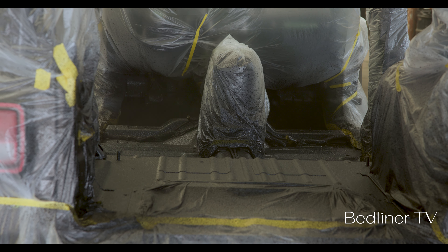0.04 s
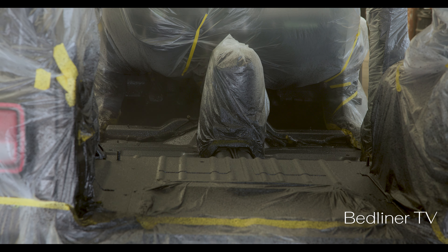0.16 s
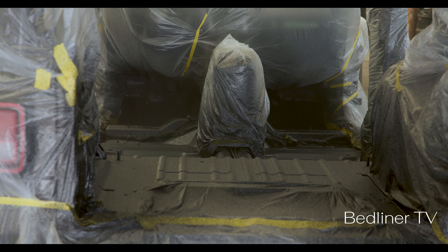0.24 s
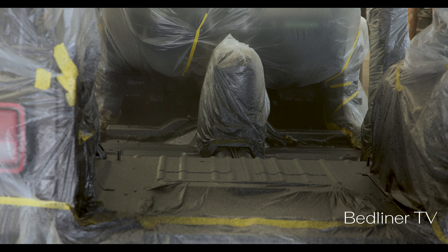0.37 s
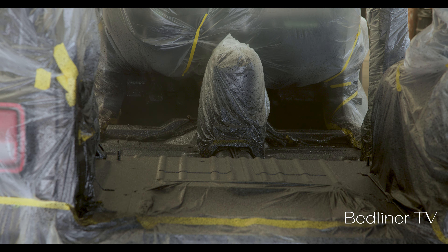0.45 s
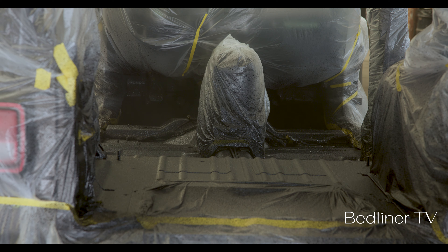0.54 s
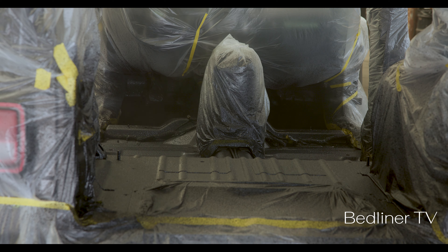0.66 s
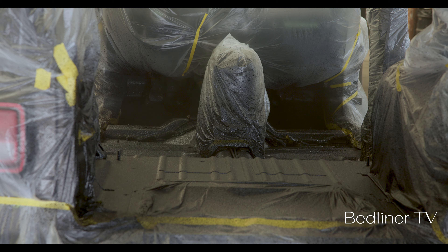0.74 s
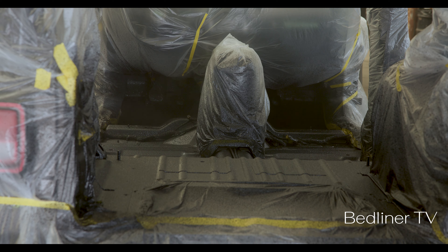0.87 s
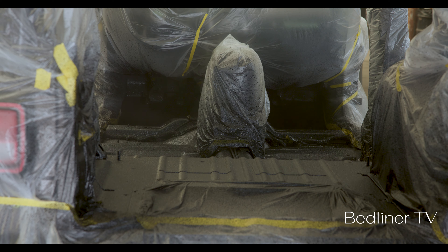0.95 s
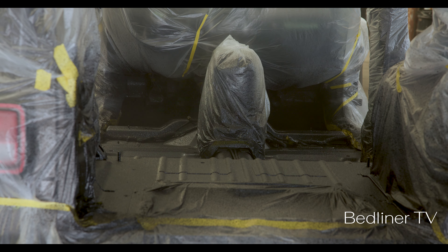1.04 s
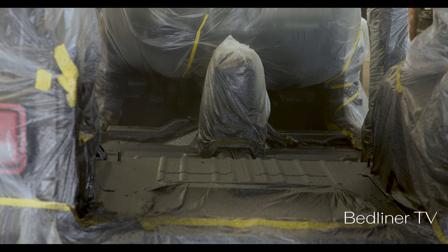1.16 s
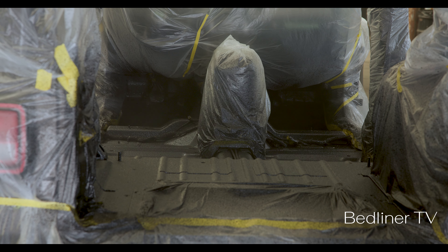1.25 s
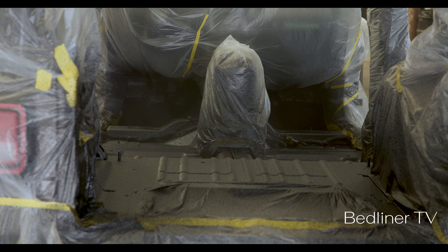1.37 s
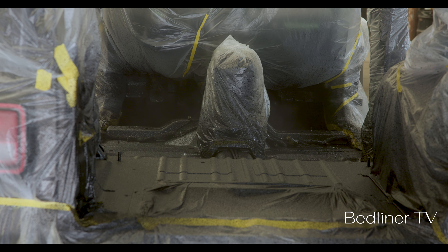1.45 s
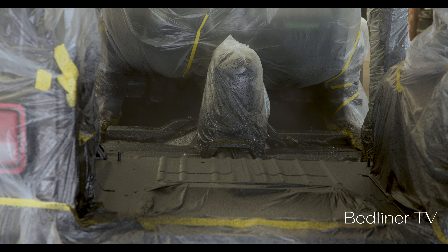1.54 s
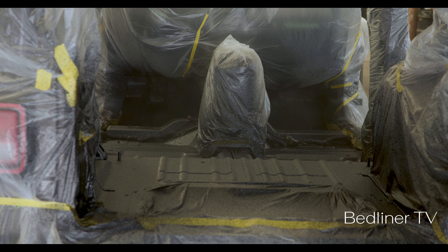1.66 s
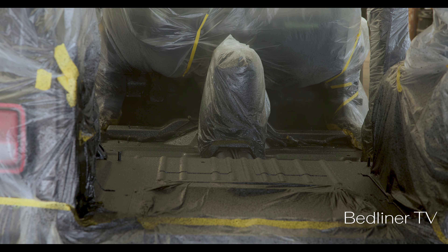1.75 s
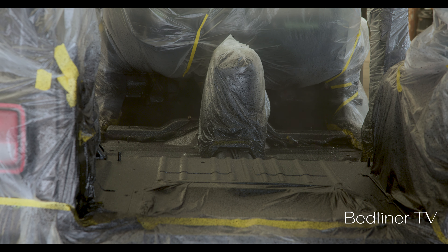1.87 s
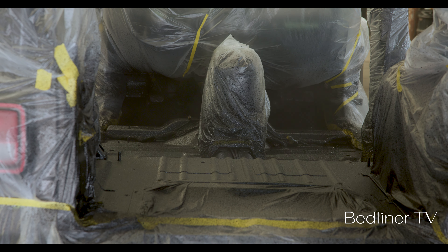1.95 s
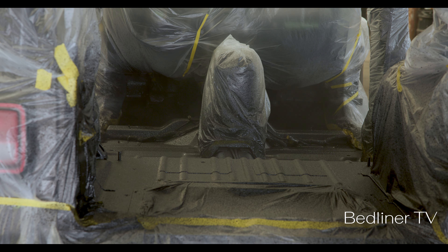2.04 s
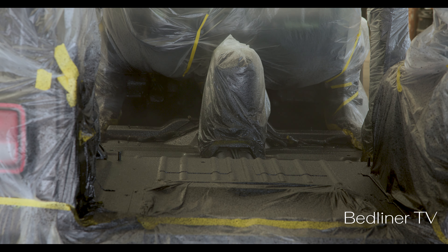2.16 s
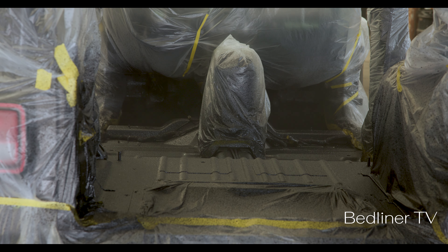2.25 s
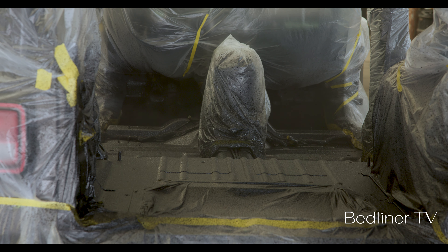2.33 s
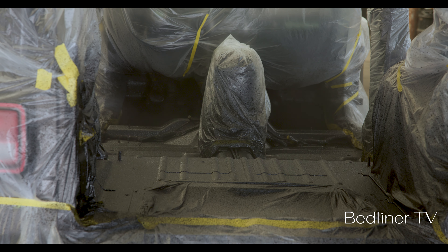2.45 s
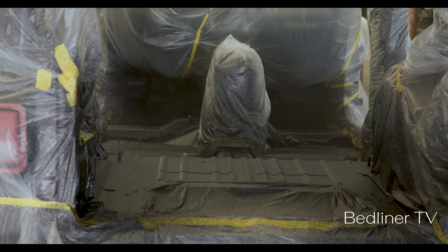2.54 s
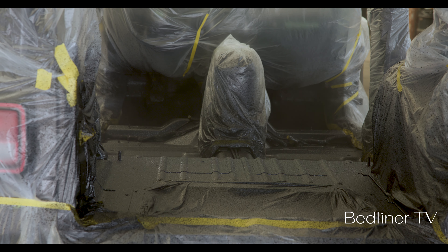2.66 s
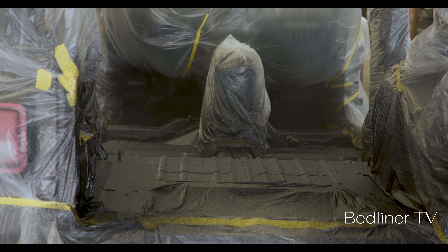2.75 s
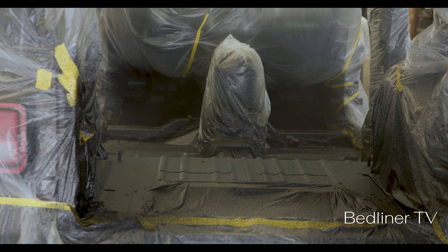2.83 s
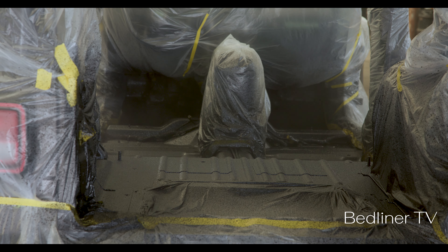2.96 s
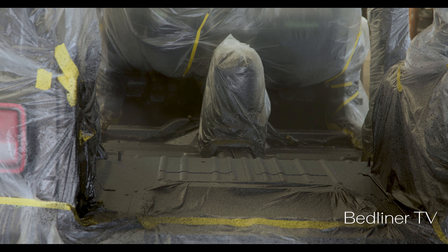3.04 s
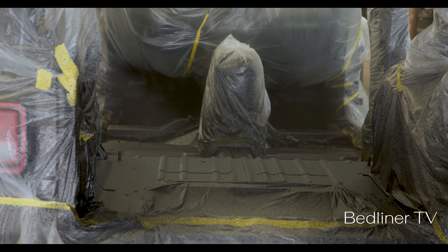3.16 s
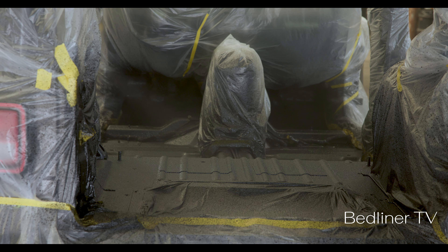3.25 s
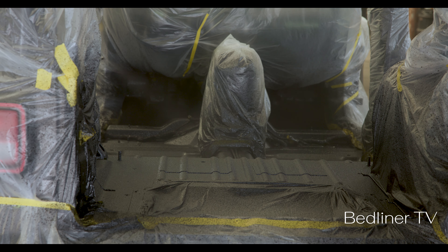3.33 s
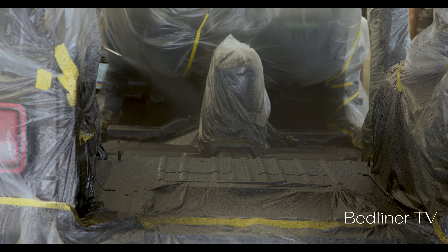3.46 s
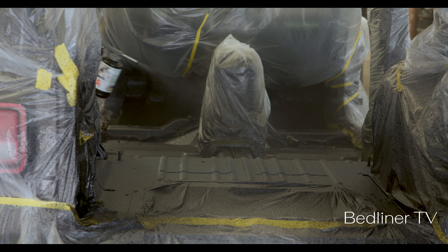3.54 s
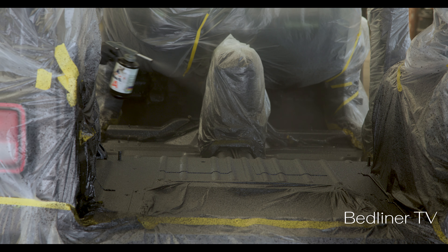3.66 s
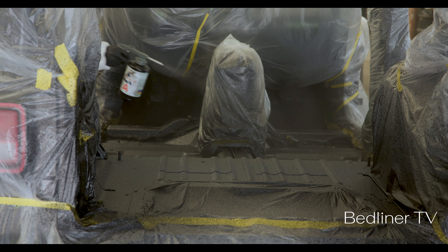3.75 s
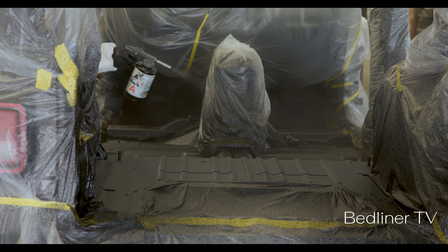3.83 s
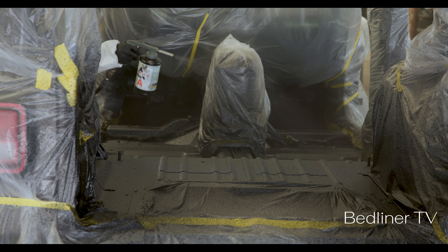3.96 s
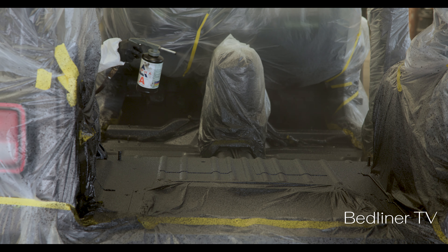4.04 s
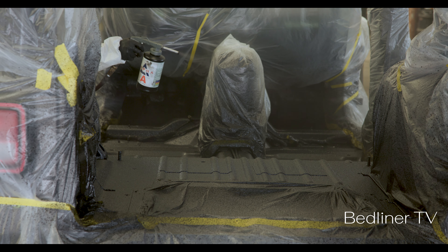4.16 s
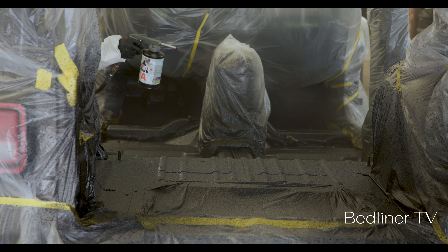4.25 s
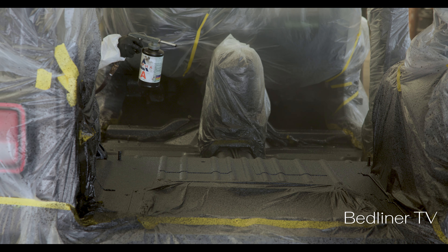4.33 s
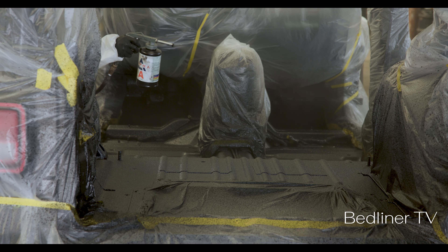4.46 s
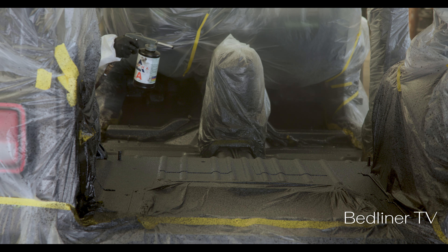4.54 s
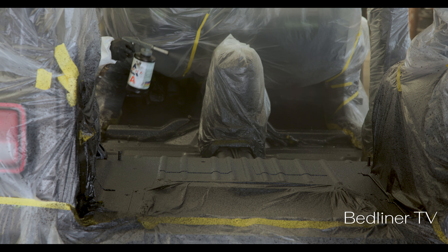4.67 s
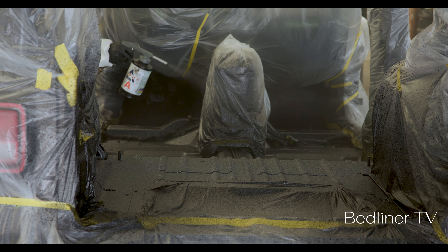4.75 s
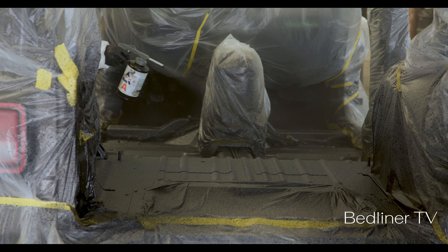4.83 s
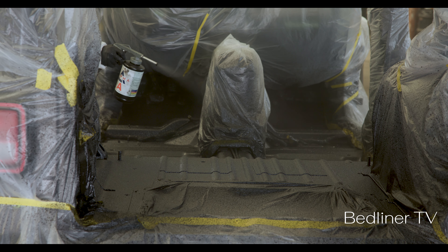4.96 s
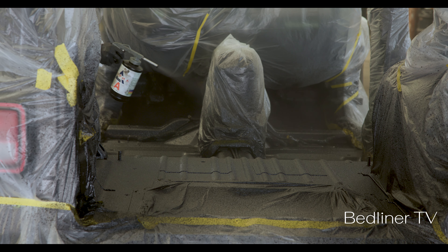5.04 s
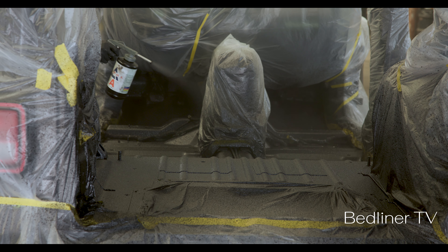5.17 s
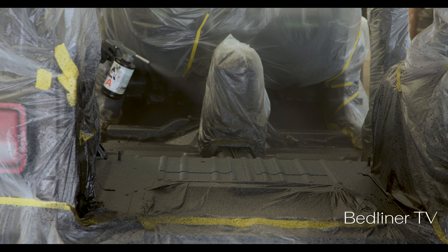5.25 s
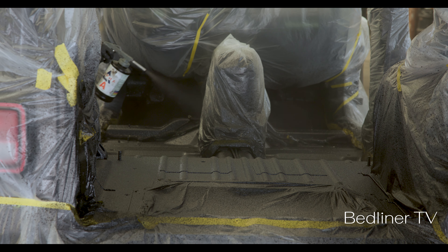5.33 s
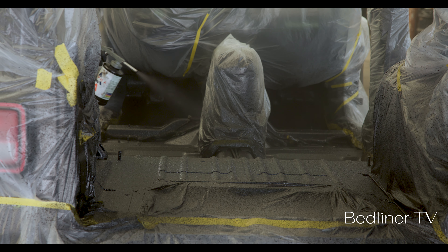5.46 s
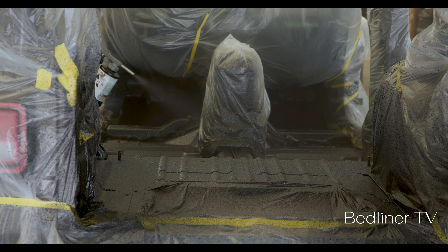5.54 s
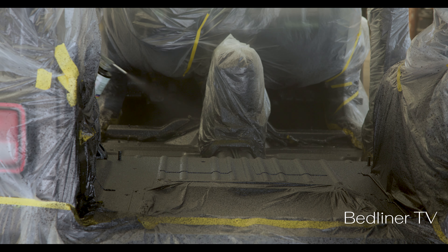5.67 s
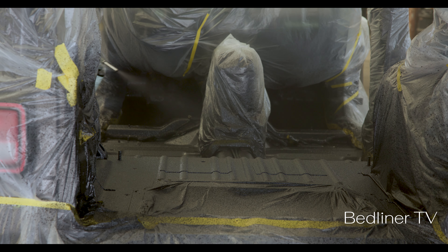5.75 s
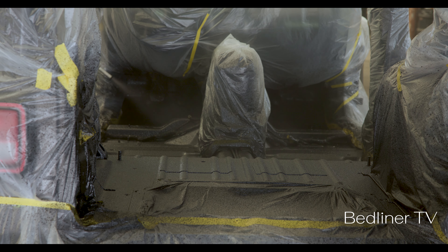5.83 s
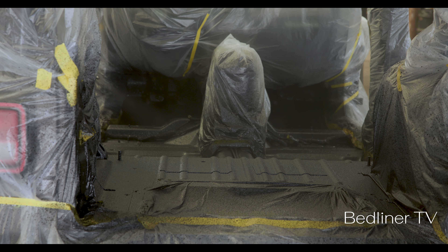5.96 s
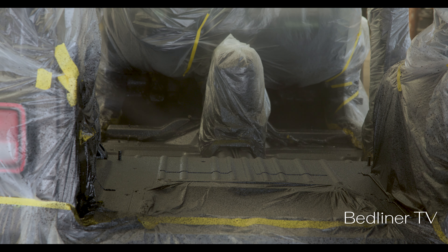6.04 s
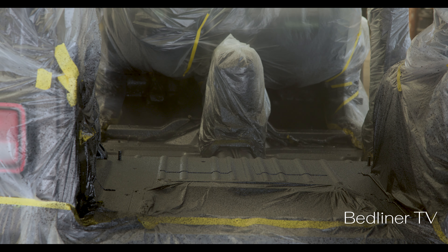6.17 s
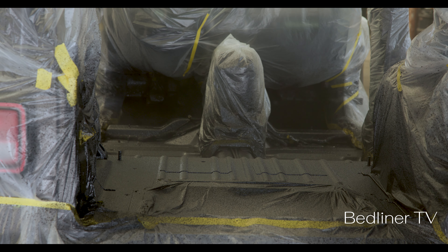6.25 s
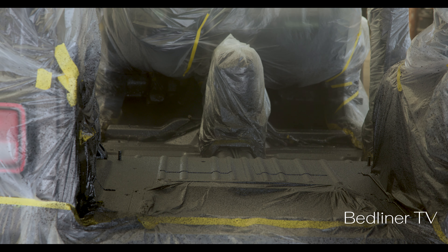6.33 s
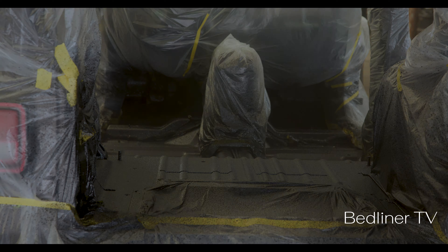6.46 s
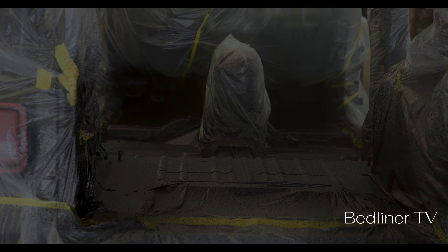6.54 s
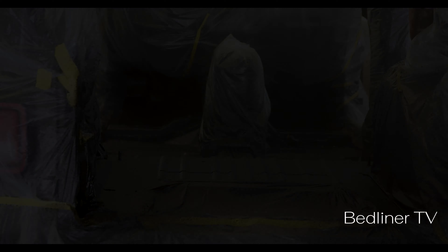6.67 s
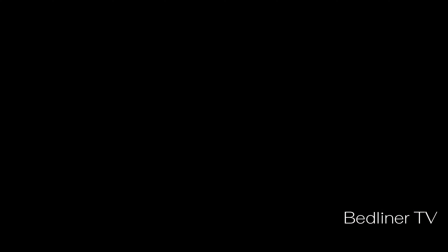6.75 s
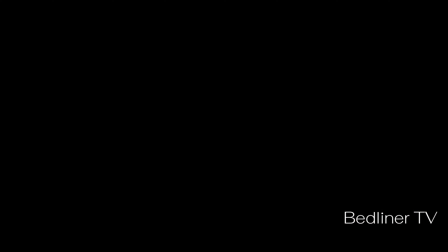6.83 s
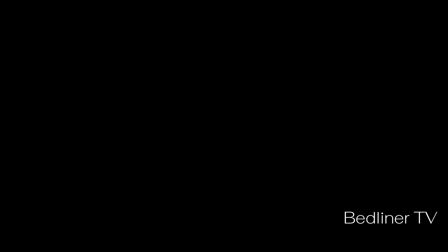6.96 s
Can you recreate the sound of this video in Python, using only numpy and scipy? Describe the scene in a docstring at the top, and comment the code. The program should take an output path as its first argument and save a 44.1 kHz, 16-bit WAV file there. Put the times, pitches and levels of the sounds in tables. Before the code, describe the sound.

Harsh airy spraying in a plastic-lined van stops for half a second, dull bumps are heard, and the rough hiss resumes before a final fade.

```python
"""An air spray gun hisses and sputters: turbulent noise split into six bands, each with its own level.
The trigger is let go once and pulled again; changing delays shift the echoes off the near panels.
The gun works inside a van lined with plastic sheet, whose reverberation is built from decaying noise;
a click, soft sine knocks and a faint noise rustle accompany it. Behind, a workshop hums and rumbles.
One small microphone hears it all, and the whole sound is faded out at the end."""
import sys
import numpy as np
from scipy import signal
from scipy.fft import rfft, irfft, next_fast_len
from scipy.io import wavfile
from scipy.ndimage import uniform_filter1d, map_coordinates

SR = 44100
rng = np.random.default_rng(int(sys.argv[2]) if len(sys.argv) > 2 else 0)


def to_wav(s):
    """Save 16-bit WAV."""
    ch = np.atleast_2d(s).T  # columns
    pcm = np.round(np.clip(ch, -1, 1) * 32767)  # PCM
    wavfile.write(sys.argv[1], SR, pcm.astype(np.int16))


N = 308700
TIME_S = np.arange(N) / SR


def amp(db):
    """Decibels to an amplitude ratio: 20 dB is a factor of ten."""
    return 10 ** (np.asarray(db) / 20)


def unit(x):
    """Normalise to a root-mean-square value of 1."""
    return x / np.sqrt(np.mean(x ** 2) + 1e-20)


def along(points, hz):
    """Interpolate (Hz, value) points on a logarithmic frequency axis."""
    f, v = np.transpose(points)
    return np.interp(np.log(hz + 1), np.log(f + 1), v)


def curves(rows):
    """Interpolate linearly in time: one value per sample for each column after the time."""
    s, *cols = np.transpose(rows)
    return [np.interp(TIME_S, s, c) for c in cols]


def wobble(rate):
    """Slow random modulation: a smooth curve through random knots, rate of them a second."""
    knots = rng.standard_normal(int(N * rate / SR) + 4)
    return map_coordinates(knots, [np.arange(N) * rate / SR])


def filtered(x, response):
    """Linear filtering: the spectrum of x is multiplied by a response of frequency."""
    m = next_fast_len(N + SR // 2)
    hz = np.fft.rfftfreq(m, 1 / SR)
    return irfft(rfft(x, m) * response(hz), m)[..., :N]


def noise(spectrum):
    """Spectral shaping: white noise is coloured by (Hz, dB) points and brought to rms 1."""
    return unit(filtered(rng.standard_normal(N), lambda hz: amp(along(spectrum, hz))))


def workshop():
    """Superposition of lumpy low noise, a phase-modulated mains hum that breaks up and thin far air noise."""
    # spectrum of the rumble: frequency_hz, density_db
    rumble_spectrum = [(15, -50), (30, -22), (86, -9), (113, -6), (146, -3.5), (220, -6.5), (340, -9.5),
                       (570, -120)]
    # course of the rumble: time_s, level_db
    rumble_course = [(.4, -71), (.64, -74), (.9, -64), (1.1, -63), (1.3, -65), (1.5, -77), (3.3, -75.5),
                     (3.45, -66), (4.25, -69.5), (4.45, -76), (6.4, -73.5)]
    # spectrum of the far air: frequency_hz, density_db
    air_spectrum = [(200, -3.5), (400, 5), (800, -1), (1150, -4.5), (1500, -9.5), (2300, -3), (4000, -12),
                    (8000, -24), (16000, -31)]
    # course of the far air: time_s, level_db
    air_course = [(.55, -67), (.66, -70), (.8, -67.5), (.88, -67), (1.0, -64)]
    hum_hz, hum_db = 120, -71
    swell_db = .8  # the rumble swells a few times a second

    waver_rad = .7 * wobble(12)
    throb_db = 2 * wobble(8) - 6 * np.abs(wobble(4))
    hum = np.sqrt(2) * np.sin(2 * np.pi * hum_hz * TIME_S + waver_rad) * amp(throb_db)
    rumble = unit(amp(2.2 * wobble(11)) * noise(rumble_spectrum))
    rumble_db = curves(rumble_course)[0] + swell_db * wobble(3.44)
    air_db = curves(air_course)[0] + .8 * wobble(25)
    return amp(hum_db) * hum + amp(rumble_db) * rumble + amp(air_db) * noise(air_spectrum)


def cabin(x):
    """Reverberation as exponentially decaying noise, each frequency dying at its own speed."""
    # decay of the enclosure: frequency_hz, t60_s
    decay = [(200, 0.27), (2000, 0.21), (6000, 0.29), (12000, 0.11)]
    # the decaying noise is drawn anew twelve times a second and crossfaded, so no fixed colour rings on
    hop = SR // 12
    window = np.sqrt(np.hanning(2 * hop))  # crossfade of equal power
    out = np.zeros(N + 2 * SR)
    for start in range(-hop, N, hop):
        hz, t, z = signal.stft(rng.standard_normal(SR // 2), SR, nperseg=256)
        decay_db = -60 * t / along(decay, hz)[:, None]
        tail = signal.istft(z * amp(decay_db), SR, nperseg=256)[1]
        first = max(start, 0)
        piece = x[first:start + 2 * hop] * window[max(-start, 0):][:N - first]
        wet = signal.fftconvolve(piece, tail / np.linalg.norm(tail))
        out[first:][:len(wet)] += wet
    return out[:N]


def rustle():
    """Crinkling as randomly modulated noise: the plastic sheet stirs before the trigger is pulled again."""
    # spectrum of the sheet: frequency_hz, density_db
    sheet_spectrum = [(1500, -30), (3500, -3), (6000, 2), (10000, -30)]
    # course of the crinkling: time_s, level_db
    sheet_course = [(.87, -97), (.9, -75), (1.03, -81)]
    return amp(curves(sheet_course)[0] + 3 * wobble(120)) * noise(sheet_spectrum)


def knocks():
    """Modal decay: each soft contact is a dull, short mode with a weaker, quicker one above it."""
    # contacts as the painter shifts: start_s, level_db, pitch_hz, t60_s
    contacts = [(.235, -52, 135, .14), (.672, -45, 150, .055), (.697, -48, 185, .05), (.772, -59, 410, .09),
                (.807, -44, 300, .025), (.812, -35, 160, .035), (.86, -54, 140, .07), (.895, -55, 300, .06),
                (.972, -49, 140, .07), (1.022, -40, 190, .06), (1.245, -46, 170, .06)]
    out, t = np.zeros(N + SR), np.arange(SR // 5) / SR
    for start_s, level_db, pitch_hz, t60_s in contacts:
        lower = np.sin(2 * np.pi * pitch_hz * t)
        upper = .5 * amp(-40 * t / t60_s) * np.sin(2 * np.pi * 1.32 * pitch_hz * t)
        onset = 1 - np.exp(-t / 0.0035)
        out[round(start_s * SR):][:len(t)] += amp(level_db - 60 * t / t60_s) * onset * (lower + upper)
    # the knocks carry no deep bass
    radiation = signal.butter(N=3, Wn=95, btype="high", fs=SR, output="sos")
    return signal.sosfilt(radiation, out[:N])


def trigger_click():
    """Impact as a short puff of mid-range noise, decaying exponentially: the trigger meets its stop."""
    # one impact: start_s, level_db, t60_s
    start_s, level_db, t60_s = (.571, -54, .025)
    t = TIME_S - start_s
    tick = noise([(200, -30), (400, 0), (900, -2), (1800, -14), (5000, -40)])  # (Hz, dB)
    onset = np.clip(t / 0.0023, 0, 1)
    return onset * amp(level_db - 60 * np.abs(t) / t60_s) * tick


def patchy(x, depth_db, bins, frames):
    """Turbulent intermittency: eddies brighten now one band, now another, the treble most."""
    hz, _, z = signal.stft(x, SR, nperseg=512)
    field = uniform_filter1d(rng.standard_normal(z.shape), round(bins), 0)
    field = uniform_filter1d(field, round(frames), 1)
    depth = depth_db * np.clip(0.24 + hz / 4000, 0, 1.3)[:, None]
    return signal.istft(z * amp(depth * unit(field)), SR, nperseg=512)[1][:N]


def echo(x, delay_ms):
    """Propagation delay: x heard over a longer path whose length changes."""
    return map_coordinates(x, [np.arange(N) - delay_ms * SR / 1000], mode="mirror")


def near_echoes(x, count, strength, drift_ms):
    """Comb filtering by interference with delayed copies; the combs slide as the gun moves."""
    # echo paths: time_s, panel_share, panel_delay_ms, wall_delay_ms, floor_delay_ms, cup_delay_ms
    # (the sprayed panel, the side wall, the floor and the paint cup)
    paths = [(0, 0.17, 2.56, 1.04, 0.6, 0.13), (.45, 0.87, 2.99, 1.12, 0.47, 0.15),
             (1.2, 0.29, 2.67, 1.51, 0.48, 0.13), (1.9, .1, 2.23, 1.52, 0.39, 0.076),
             (2.1, 0.28, 2.03, 1.57, 0.46, 0.098), (2.9, 0.17, 1.92, 1.66, 0.41, 0.092),
             (3.3, 0.12, 2.1, 1.65, 0.45, 0.14), (3.75, 0.1, 1.87, 1.29, 0.4, 0.16),
             (4.2, 0.41, 2.195, 1.2, 0.35, 0.23), (4.7, 0.31, 2.24, 1.01, 0.24, 0.18),
             (5.3, 0.3, 1.85, 1.7, 0.16, 0.19), (5.7, 0.45, 2.276, 1.35, 0.042, .15),
             (6.1, 0.4, 2.43, 1.4, 0.12, 0.12), (6.5, 0.26, 2.48, 1.25, 0.34, 0.081)]
    # mean shares that side wall, floor and cup return: share (one number each)
    mean_returns = [0.13, 0.15, 0.14]
    turning = 0.35  # depth by which the shares swell and shrink as the gun turns

    def steel(hz):
        """Selective reflection: steel faces return mostly the middle of the hiss."""
        hump = 0.13 + 0.61 / (1 + ((hz - 2700) / 1300) ** 2)
        return 1.26 * hump / np.sqrt(1 + (hz / 9000) ** 4)

    middle = filtered(x, steel)
    dull = filtered(x, lambda hz: 1 / np.sqrt(1 + (hz / 5500) ** 6))
    out, energy = x.copy(), 1
    panel_share, *delays = curves(paths)
    # panel and wall are steel, the floor dulls, the cup returns the whole hiss
    for delay_ms, share, sent in zip(delays, [panel_share, *mean_returns], (middle, middle, dull, x)):
        out += share * (1 + turning * wobble(2.91)) * echo(sent, delay_ms)
    # the wrinkled sheet returns many weak, wandering copies of the whole hiss
    for delay_ms in np.geomspace(1.5, 11, count):
        gain = strength * wobble(7)
        out += gain * echo(x, delay_ms + drift_ms * wobble(5))
        energy = energy + gain ** 2
    return out / np.sqrt(energy)


def stranded(x):
    """Time-varying equalisation: narrow bands stand out or thin as the gun moves among the panels."""
    # one course per strand, low to high: time_s, centre_hz, lift_db
    courses = [
        [(0, 332, 1), (1.4, 350, 0), (2.2, 420, -4), (5.3, 403, -1), (5.75, 410, -10), (6.4, 410, -12)],
        [(0, 790, 3), (.45, 810, 4), (1.2, 690, -0.5), (1.6, 800, 2), (2.25, 1100, 1.5), (3.0, 1120, 2),
         (4.1, 955, 2), (4.9, 990, 5), (5.6, 1300, 1.5), (6.0, 1260, 2), (6.3, 1080, 6), (6.6, 840, 5),
         (7, 840, 4)],
        [(0, 2130, 6), (.45, 2200, 3), (1.05, 2270, 2.5), (1.3, 2130, 3), (1.6, 2170, 3.5), (2.25, 2480, 3.5),
         (2.95, 2560, 1), (3.3, 2420, 2), (4.1, 2390, -3), (4.55, 2620, 5.5), (5.1, 2400, -1.5),
         (5.55, 2170, 1.5), (6.0, 2230, 0), (6.3, 2230, 5), (6.65, 2210, 7.5), (7, 2300, 4)],
        [(0, 3180, 2.5), (.2, 3150, 6), (.4, 3580, 5.5), (1.05, 3150, -4.5), (1.3, 3620, 5.5),
         (1.55, 3650, 7.5), (1.9, 3100, 2), (2.2, 2880, 6.5), (2.55, 2950, 5), (3.0, 2980, 2), (3.2, 3400, -2),
         (5.45, 3240, -2.5), (6.5, 3020, -5), (7, 2750, 0)],
        [(0, 5200, -5), (.35, 5940, 3.5), (1.2, 5600, -1), (2.7, 5900, -2.5), (3.1, 4970, 4.5), (3.4, 5030, 6),
         (3.8, 5440, 2), (4.5, 6030, 2), (5.1, 5400, 5.5), (5.5, 5700, -1.5), (6.4, 5400, 2.5),
         (6.8, 5300, 5.5)],
        [(0, 7430, 3), (1.2, 7400, 5), (2.25, 7460, -5.5), (3.1, 7500, 1.5), (4.7, 7600, 0), (5.1, 7000, 5.5),
         (5.8, 7140, -3.5), (6.4, 7100, 0.5), (7, 7300, -1)],
        [(0, 8800, -5), (1.1, 8900, 2), (1.7, 9200, 3), (2.4, 8940, 0.5), (3.1, 8700, 4.5), (3.6, 8600, -2.5),
         (4.4, 9000, -0.5), (5.2, 8600, -2.5), (6.3, 8400, 3.5), (7, 9050, 2)],
    ]
    # spread of each strand about its centre: standard_deviation_hz
    spreads = [50, 149, 140, 120, 400, 403, 400]
    hz, t, z = signal.stft(x, SR, nperseg=1024)
    lift_db = 0
    for rows, spread_hz in zip(courses, spreads):
        s, centre, db = np.transpose(rows)
        offset = (hz[:, None] - np.interp(t, s, centre)) / spread_hz
        lift_db = lift_db + np.interp(t, s, db) * np.exp(-.5 * offset ** 2)
    return signal.istft(z * amp(lift_db), SR, nperseg=1024)[1][:N]


def spray_gun():
    """Turbulent jet noise: air leaves the nozzle as broadband hiss and paint slugs make the flow sputter."""
    # core and treble balance: time_s, core_level_db, lean_db (up favours the sizzle, down the top)
    jet_course = [(0, -29, 13.5), (.2, -30, 8), (.44, -30.5, -1), (1.03, -31.5, -1), (1.2, -32.5, -1),
                  (1.5, -37.5, -2), (1.95, -38, 0), (2.24, -35, -9), (2.76, -36, -1), (3.1, -33, 4),
                  (3.54, -32.5, -11), (4.06, -34.5, 0), (4.32, -36.5, 1.5), (4.84, -33, -5.5),
                  (5.1, -33, -4), (5.36, -33, -6), (5.65, -34, 10), (6.14, -34.5, -2.5), (6.4, -35, 6.5),
                  (7, -31.5, 7.5)]
    # bands in the order core, body, roar, hiss, sizzle, top: from_hz, to_hz
    bands = [(1600, 3600), (0, 410), (410, 1600), (3600, 7000), (7000, 10000), (10000, 20000)]
    # spectrum of the nozzle: frequency_hz, density_db
    nozzle_spectrum = [(120, -60), (200, -30.5), (316, -21), (509, -5.5), (949, -4.5), (1770, -7),
                       (2600, -2.5), (3300, -7.5), (4200, -10), (5000, -7.5), (9000, -15), (10000, -20.5),
                       (10800, -20), (14300, -35.5), (16000, -44)]
    # valve opening: time_s, flow_db
    valve_course = [(.452, -5), (.468, -30), (.5, -38), (.56, -44), (.64, -51), (1.006, -70), (1.012, -16),
                    (1.024, 3), (1.07, -1.5)]
    # short surges of the core as slugs of paint pass: centre_s, rise_db
    slugs = [(0.095, 5.5), (1.255, 4), (1.975, 7.5), (2.204, 5.5), (2.49, 3), (4.538, 6.5), (4.62, 4.5),
             (5.603, 5.5), (5.812, 3.5)]
    # courses of body, roar, hiss and top: time_s, level_db
    body_course = [(.44, -47), (1.2, -50), (1.75, -60), (4.9, -61), (5.4, -57), (5.9, -57.5), (7, -55)]
    roar_course = [(0, -35.5), (1.5, -39.5), (6.3, -41), (6.55, -40.5), (7, -40)]
    hiss_course = [(.3, -32), (1.1, -36), (2.5, -36), (2.9, -40.5), (4.5, -39.5), (5.1, -39.5), (5.5, -40),
                   (7, -36)]
    top_course = [(0, -35.5), (1.1, -41.5), (1.5, -47), (2.1, -44.5), (3.1, -45), (4.7, -45.5),
                  (5.0, -41.5), (5.7, -44.5), (6.4, -44), (7, -40.5)]
    sizzle_db = -48  # before the lean is added
    top_leans = 0.22  # dB the top loses for each dB the sizzle gains
    drift_db = 0.5  # every band also drifts by itself
    surge_s = 0.013  # time from the peak of a surge until its rise in dB falls to 1/e

    sputter = amp(0.17 * wobble(10) + 0.23 * wobble(21.9) + 0.97 * wobble(150))
    air = patchy(sputter * rng.standard_normal(N), depth_db=1.44, bins=9, frames=10)
    heard = near_echoes(air, count=12, strength=0.11, drift_ms=0.036)

    core_db, lean_db = curves(jet_course)
    surge_db = sum(db * np.exp(-((TIME_S - s) / surge_s) ** 2) for s, db in slugs)
    body_db, roar_db, hiss_db, top_db = [
        curves(rows)[0] for rows in (body_course, roar_course, hiss_course, top_course)]
    levels = [core_db + surge_db, body_db, roar_db, hiss_db,
              sizzle_db + lean_db, top_db - top_leans * lean_db]
    jet = 0
    for (lo, hi), level_db in zip(bands, levels):
        def band(hz):
            """Band-pass filtering of the nozzle spectrum."""
            edges = (1 + (lo / (hz + 1)) ** 12) * (1 + (hz / hi) ** 12)
            return amp(along(nozzle_spectrum, hz)) / np.sqrt(edges)

        gain = amp(level_db + drift_db * wobble(4.155))
        jet = jet + gain * unit(filtered(heard, band))
    return stranded(jet) * amp(curves(valve_course)[0])


def scene():
    """Superposition of the near sources, their reverberation and the workshop, alike in both channels."""
    near = spray_gun() + trigger_click() + knocks() + rustle()
    mono = near + amp(-13.5) * cabin(near) + workshop()
    return np.array([mono, mono])


def record(dry):
    """Band limiting: the microphone drops deep bass, the end is faded and the highest treble removed."""
    top_hz = 15750
    fade_s, fade_db, fade_bend = 6.376, 33, 1.26  # start, depth at the end, curvature
    bass_cut = signal.butter(N=2, Wn=64, btype="high", fs=SR, output="sos")
    thin = signal.sosfilt(bass_cut, dry)
    gone = np.clip((TIME_S - fade_s) / (N / SR - fade_s), 0, 1)
    return filtered(thin * amp(-fade_db * gone ** fade_bend), lambda hz: hz < top_hz)


dry = scene()
out = record(dry)
to_wav(out)
```